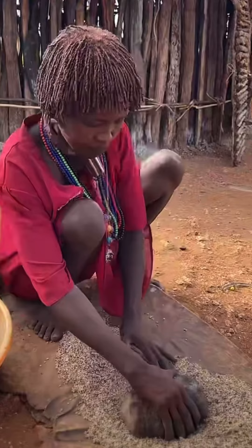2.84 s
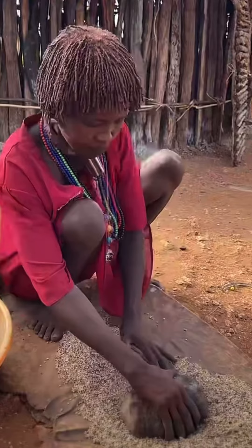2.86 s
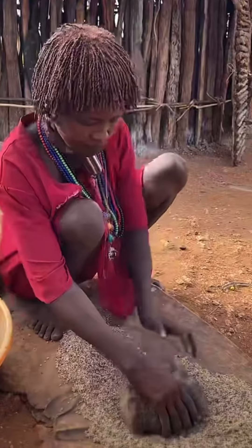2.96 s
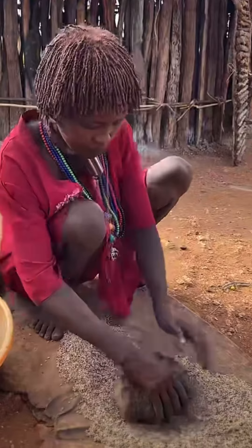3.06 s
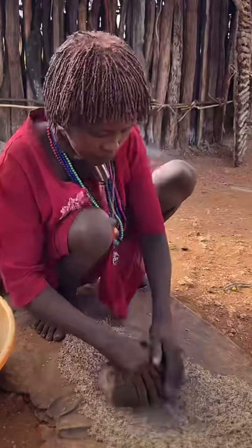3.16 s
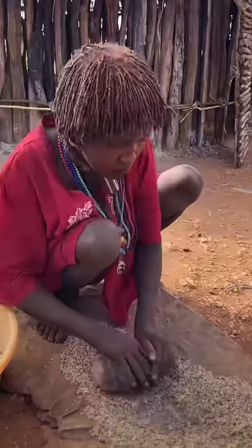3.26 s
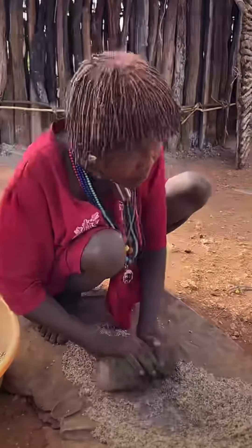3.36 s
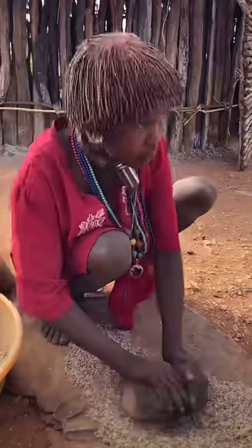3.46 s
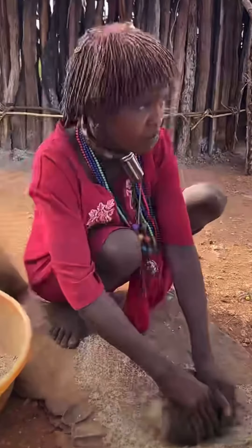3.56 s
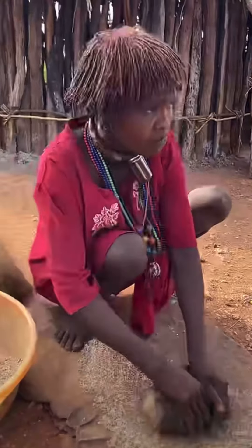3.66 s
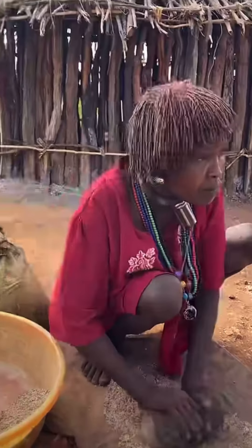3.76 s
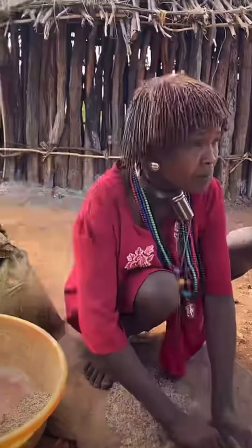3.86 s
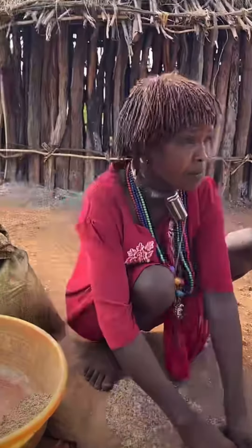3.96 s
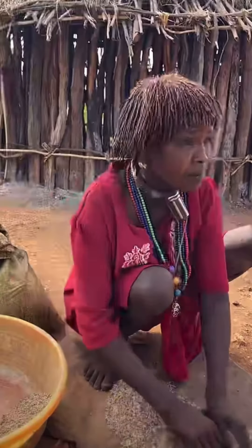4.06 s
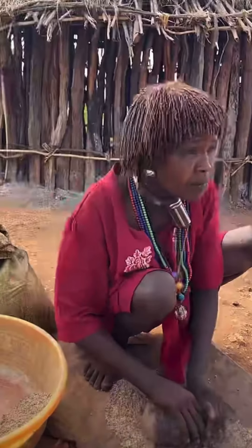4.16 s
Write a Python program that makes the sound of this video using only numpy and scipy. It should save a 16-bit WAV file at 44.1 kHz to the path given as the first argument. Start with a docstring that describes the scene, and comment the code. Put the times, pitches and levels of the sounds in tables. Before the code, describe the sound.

Close to the microphone in a quiet outdoor yard, a hand stone nudges grain on a slab, then grinds in strong rasping strokes with cracking kernels. The work drops to almost nothing for about a second, with a soft thump and faint touches, before rough strokes return with hissing loose grain and a deeper thump. The sound is dry, with almost no echo.

```python
"""Outdoors in a quiet yard, close by: a hand stone grinds dry grain on a stone slab.
Small nudges grow into strong strokes, the work nearly falls silent, then strong strokes return.
Tiny random fractures ring stone, slab and husks as rasp, rumble and crunch; whole kernels crack on top.
Loose grain hisses, the stone bumps the slab, and two dull thumps sink in pitch.
Near reflections, a faint echo, still air and at first a far tone place it in the yard."""
import sys
import numpy as np
from scipy import signal
from scipy.fft import rfft, irfft
from scipy.io import wavfile
from scipy.ndimage import uniform_filter1d

SR = 44100
rng = np.random.default_rng(int(sys.argv[2]) if len(sys.argv) > 2 else 0)


def digitize_waveform(pressure):
    """Quantize a signal to 16-bit integers and store it at the path in sys.argv[1].

    Rows of a 2-D input are taken as channels; values are limited to [-1, 1].
    """
    field = np.atleast_2d(pressure).T
    bounded = np.clip(field, -1, 1)
    quanta = np.round(bounded * 32767).astype(np.int16)
    wavfile.write(sys.argv[1], SR, quanta)


N = 185308

# colour of the slab's ring, relative: [f/Hz, level/dB]
SLAB_COLOUR = [(25, -38), (60, -26), (110, -17), (170, -10.5), (250, -9), (330, -2), (390, 3), (490, 5.5),
               (580, -1), (800, -24.5), (1400, -55)]
# colour of the splitting husks, relative: [f/Hz, level/dB]
HUSK_COLOUR = [(1700, -10), (2500, -0.5), (3200, 4), (4200, -3.5), (5100, -3), (6500, -10), (7900, -8),
               (8800, -15), (9600, -21.5), (12000, -28), (14200, -20), (16000, -30)]


def from_db(db):
    """Decibels to gain."""
    return 10 ** (np.asarray(db) / 20)


def rms_one(x):
    """Scale to an rms of 1."""
    return x / np.sqrt(np.mean(x ** 2) + 1e-20)


def drift(rate_hz):
    """Smooth random wandering with an rms of 1: noise through two equal one-pole lowpasses."""
    r = np.exp(-2 * np.pi * rate_hz / SR)
    noise = rng.standard_normal(N + SR)
    # the first second lets the filter settle
    return rms_one(signal.lfilter([1], [1, -2 * r, r * r], noise)[SR:])


def envelope_db(start_s, end_s, attack_s, release_s):
    """Attack, hold and release in dB; attack and release times are for 60 dB."""
    t = np.arange(N) / SR
    before = np.maximum(start_s - t, 0) / attack_s
    after = np.maximum(t - end_s, 0) / release_s
    return -60 * (before + after)


def resonance(force, hz, width_hz):
    """One damped mode, scaled to an rms of 1."""
    r = np.exp(-np.pi * width_hz / SR)
    poles = [1, -2 * r * np.cos(2 * np.pi * hz / SR), r * r]
    return rms_one(signal.lfilter([1, 0, -1], poles, force))


def body(force, colour, size=4096):
    """Ring a heavily damped body of the given colour: minimum phase, with unit energy."""
    hz, level_db = np.transpose(colour)
    grid_hz = np.maximum(np.arange(size // 2 + 1) * SR / size, 1)
    grid_db = np.interp(np.log(grid_hz), np.log(hz), level_db)
    # folding the cepstrum forward makes the response causal
    cepstrum = irfft(np.log(from_db(grid_db)))
    cepstrum[1:size // 2] *= 2
    cepstrum[size // 2 + 1:] = 0
    response = irfft(np.exp(rfft(cepstrum)))
    return signal.fftconvolve(force, response / np.linalg.norm(response))[:len(force)]


def stroke_levels():
    """The stone bites, is loaded unevenly and runs out: rasp, rumble and crunch in dB."""
    # moves of the hand stone, from nudges to full strokes; bite and die-away times are for 60 dB:
    # [start t/s, crest t/s, end t/s, crest rasp level/dB, bite t/s, die-away t/s,
    #  slab rumble relative to rasp level/dB, husk crunch relative to rasp level/dB]
    strokes = [(0.0, 0.024, 0.031, -49.5, 0.032, 0.35, 0.5, -8.5),
               (0.258, 0.327, 0.32, -38, 0.057, 0.31, -9, -9.5),
               (0.505, 0.53, 0.57, -32.5, 0.042, 0.13, -5.5, -23),
               (0.641, 0.638, 0.67, -32, 0.05, 0.12, 0.5, -13.5),
               (0.748, 0.738, 0.79, -34.5, 0.064, 0.098, -22, -16),
               (0.879, 0.946, 1.01, -19.5, 0.037, 0.21, -15.5, -11),
               (1.171, 1.277, 1.321, -17, 0.036, 0.16, -4, -12.5),
               (1.37, 1.388, 1.39, -31, .06, 0.1, -6, -7.5),
               (1.419, 1.484, 1.57, -14.5, 0.058, 0.13, -9, -13),
               (1.701, 1.763, 1.808, -18, 0.034, 0.069, -7.5, -14),
               (1.83, 1.816, 1.95, -29.5, 0.056, 0.1, -5, -10),
               (1.928, 1.968, 2.133, -17, 0.048, 0.14, -9, -11),
               (2.303, 2.322, 2.35, -45.5, .01, 0.12, -5.5, -4),
               (2.492, 2.538, 2.6, -42.5, 0.085, 0.049, -5, -16),
               (2.67, 2.86, 2.8, -57.5, .3, 0.65, -6, -18),
               (3.133, 3.14, 3.172, -37, 0.041, 0.074, -21, -14),
               (3.202, 3.254, 3.26, -49, .05, 0.25, -7, -13),
               (3.415, 3.499, 3.543, -17.5, 0.049, 0.19, -11, -13),
               (3.727, 3.794, 3.82, -20.5, 0.12, 0.12, -4.5, -13),
               (3.877, 3.888, 3.9, -33.5, 0.068, 0.1, -14, -10.5),
               (3.923, 4.01, 4.055, -18.5, 0.095, 0.037, -10, -13.5),
               (4.118, 4.203, 4.2, -19.5, 0.033, 0.1, -7.5, -13)]
    # the stone rests on the grain and never lies quite still: [start t/s, end t/s, rasp level/dB]
    rests = [(0.42, 2.17, -61), (2.45, 3.9, -60.5)]
    rest_fade_s, rest_rumble_db, rest_crunch_db = 0.22, -7.5, -10.5
    # the load rises towards a crest or falls away from it, down to the stone's own weight;
    # a crest outside the move leaves one slope
    lean_db_per_s, sag_limit_db = 90, 14.5

    t = np.arange(N) / SR
    moves = []
    for start_s, end_s, rest_db in rests:
        level_db = rest_db + envelope_db(start_s, end_s, rest_fade_s, rest_fade_s)
        moves.append((level_db, rest_rumble_db, rest_crunch_db))
    for start_s, crest_s, end_s, crest_db, bite_s, release_s, rumble_db, crunch_db in strokes:
        from_crest_s = np.abs(np.clip(t, start_s, end_s) - crest_s)
        sag_db = np.minimum(lean_db_per_s * from_crest_s, sag_limit_db)
        level_db = crest_db - sag_db + envelope_db(start_s, end_s, bite_s, release_s)
        moves.append((level_db, rumble_db, crunch_db))

    # overlapping moves add up in power
    power = np.full((3, N), 1e-10)
    for level_db, rumble_db, crunch_db in moves:
        heard = level_db > -100
        part_db = np.array([[0], [rumble_db], [crunch_db]])
        power[:, heard] += from_db(level_db[heard] + part_db) ** 2
    return 10 * np.log10(power)


def fractures(per_s, spread_db):
    """Random clicks of either sign, many small and a few large, scaled to an rms of 1."""
    sizes = from_db(spread_db * np.minimum(rng.exponential(1, N), 4))
    signs = rng.choice([-1, 1], N)
    return rms_one(sizes * signs * (rng.random(N) < per_s / SR))


def steady_hand(force, span_s):
    """The arm keeps the mean load even, while the quick judder stays."""
    mean_power = uniform_filter1d(force ** 2, int(span_s * SR))
    return force / np.sqrt(mean_power + 1e-9)


def grinding(rasp_db, rumble_db, crunch_db, judder_db, judder_hz, powder_share, crumb_judder,
             rolling_share):
    """The stone catches and slips on the grain; the same fractures shake stone, slab and husks."""
    # colour of the hand stone's rasp, relative: [f/Hz, level/dB]
    stone_colour = [(420, -51), (600, -6), (730, -1), (850, -1), (1000, 4.5), (1250, -8), (1460, -1.5),
                    (1620, -6.5), (1840, 6), (2030, 1), (2250, -15), (2600, -32), (3300, -50)]
    slips_db = judder_db * drift(judder_hz)
    coarse = fractures(per_s=2000, spread_db=3.0)
    powder = fractures(per_s=17000, spread_db=3.0)
    force = steady_hand(from_db(slips_db) * coarse, span_s=0.038)
    crumbs = from_db(crumb_judder * slips_db) * (coarse + powder_share * powder)
    crumbs = steady_hand(crumbs, span_s=0.056)
    # riding over unbroken kernels shakes the slab as well
    rolling = rms_one(force + rolling_share * rng.standard_normal(N))
    rasp = body(force * from_db(rasp_db), stone_colour)
    rumble = body(rolling * from_db(rumble_db), SLAB_COLOUR)
    crunch = body(crumbs * from_db(crunch_db), HUSK_COLOUR)
    return rasp + rumble + crunch


def shifting_contact(x, patchy_db, shift_hz, count=9):
    """The touching points keep moving, so each band of the ring comes and goes on its own."""
    out, rest = 0, x
    for edge_hz in np.geomspace(400, 10000, count):
        lowpass = signal.butter(3, edge_hz, fs=SR, output="sos")
        band = signal.sosfiltfilt(lowpass, rest)
        out = out + band * from_db(patchy_db * drift(shift_hz))
        rest = rest - band
    # roughly offset the mean power that the swings add
    return (out + rest) * from_db(-patchy_db ** 2 / 10)


def lesser_cracks(rasp_db, count=300):
    """More kernels burst at random while the stone bears down, as loud as the load allows."""
    kernels_per_s, breaking_load_db = 35, -29   # none breaks under a lighter rasp
    knock_rel_db, snap_rel_db, spread_db = -4, -17, 0.5   # relative to the rasp
    middle_hz, crumble_s = 1500, 0.0029
    chance = rng.random((count, 1))
    spread = rng.standard_normal((count, 3))
    # one chance to break in each time slot
    times_s = (np.arange(count) + chance[:, 0]) / kernels_per_s
    loads_db = np.interp(times_s * SR, np.arange(N), rasp_db, right=-np.inf)
    kernels = []
    for s, load_db, (a, b, c) in zip(times_s, loads_db, spread):
        if load_db > breaking_load_db:
            knock_db = load_db + knock_rel_db + spread_db * a
            snap_db = load_db + snap_rel_db + spread_db * b
            kernels.append((s, knock_db, snap_db, middle_hz * np.exp(0.23 * c), crumble_s))
    return kernels


def cracks(rasp_db, width_hz, edge_hz, pieces_per_s, piece_size, slab_db, burst_s, husk_ring, soft_hz,
           size=2048):
    """A kernel gives way at once, then its pieces break within a few milliseconds."""
    # single kernels that burst under the stone, faint to loud:
    # [t/s, knock level/dB, snap level/dB, knock f/Hz, crumbling time scale t/s]
    single_kernels = [(0.021, -28, -52, 1100, 0.002), (0.096, -60, -47.5, 1860, 0.0017),
                      (0.2554, -62, -40, 1210, 0.0012), (0.475, -43, -64, 1010, 0.0035),
                      (0.5097, -11.5, -44, 1000, 0.00033), (0.535, -21, -40, 1240, .0055),
                      (0.571, -16, -43, 884, 0.012), (0.58, -13, -24, 1440, .0023),
                      (0.645, -21.5, -48, 1240, .004), (0.752, -17.5, -35.5, 1530, 0.0033),
                      (0.881, -17, -19.5, 930, 0.0025), (0.894, -9.5, -32, 960, 0.0021),
                      (0.95, -17.5, -47, 1400, 0.00092), (0.959, -17, -33, 1380, 0.0066),
                      (0.98, -9, -41, 1148, 0.0062), (1.17, -23, -62, 670, 0.0025),
                      (1.183, -24, -38, 997, 0.0022), (1.2335, -10, -24.5, 1800, 0.0065),
                      (1.272, -12.5, -20, 790, .0023), (1.283, -19, -22, 1500, 0.0021),
                      (1.344, -20.5, -35, 1940, 0.0017), (1.411, -23, -28, 1520, 0.0011),
                      (1.435, -9, -17.5, 2000, 0.0021), (1.447, -21, -22, 1740, 0.0028),
                      (1.4753, -12, -36, 1820, 0.0028), (1.492, -8, -18.5, 1740, 0.0098),
                      (1.532, -13, -22, 1430, 0.0047), (1.7637, -10, -26.5, 1710, 0.0019),
                      (1.7906, -11, -27, 1500, 0.0038), (1.7987, -9.5, -24.5, 1602, 0.0007),
                      (1.934, -12, -24, 1380, 0.0012), (1.951, -10, -17, 1120, 0.0015),
                      (1.963, -10, -45, 1870, 0.0015), (2.0205, -18, -23, 1670, 0.00094),
                      (2.0274, -10.5, -22.5, 1700, 0.0016), (2.0637, -15, -25.5, 1420, 0.00082),
                      (2.1085, -13, -29.5, 1310, 0.0017), (2.2943, -17, -27.5, 1500, 0.0021),
                      (2.4955, -36.5, -34.5, 1176, 0.001), (2.522, -20, -43.5, 845, 0.0067),
                      (2.53, -27, -43, 1320, 0.00051), (2.56, -29, -49.5, 1742, 0.0013),
                      (3.1346, -23, -44.5, 1550, 0.0067), (3.153, -28.5, -39.5, 1400, 0.0055),
                      (3.19, -31, -58.5, 910, 0.0014), (3.419, -19, -26.5, 1410, 0.0005),
                      (3.428, -9.5, -19, 1600, 0.0014), (3.446, -11.5, -16.5, 1832, 0.00088),
                      (3.5057, -12, -21.5, 1760, 0.0071), (3.7857, -12.5, -28, 1430, 0.0035),
                      (3.814, -15, -31, 1370, 0.00089), (3.844, -11, -21.5, 1800, 0.0015),
                      (3.852, -10.5, -33, 1750, 0.0011), (3.884, -22, -41, 1590, 0.0013),
                      (3.9455, -10, -31, 1760, .0025), (3.9676, -10.5, -14.5, 1720, 0.0033),
                      (3.9826, -13.5, -25, 1590, .0013), (4.0155, -10, -15.5, 1260, 0.0021),
                      (4.042, -9.5, -36, 1541, 0.0067), (4.12, -18.5, -35, 1230, .0015)]
    out = np.zeros(N + size)
    t = np.arange(size) / SR
    stone_edge = signal.butter(8, edge_hz, fs=SR, output="sos")
    for s, knock_db, snap_db, hz, crumble_s in single_kernels + lesser_cracks(rasp_db):
        crumble_s = max(crumble_s, 1e-4)
        fading = np.exp(-(t / (1.94 * crumble_s)) ** 2)
        pieces = rng.standard_normal(size) * (rng.random(size) < pieces_per_s / SR)
        force = piece_size * pieces * fading
        force[0] = rng.choice([-1, 1])
        # the stone answers with a short knock, damped by hand and grain
        knock = rms_one(signal.sosfilt(stone_edge, resonance(force, hz, width_hz)))
        # the slab booms briefly underneath
        boom = resonance(resonance(force, 400, 260), 420, 300)
        knock = knock + from_db(slab_db) * boom
        # every husk splits with a shrill note of its own
        splinters = force + 0.25 * rng.standard_normal(size) * np.exp(-t / (crumble_s + 0.0023))
        shrill = resonance(splinters, rng.uniform(3000, 7710), 420)
        snap = rms_one(body(splinters, HUSK_COLOUR)) + husk_ring * shrill
        # a kernel that is squashed rather than shattered lacks the highest treble
        top_hz = np.clip(soft_hz * from_db(0.23 * (snap_db - knock_db)), 3000, .45 * SR)
        snap = rms_one(signal.sosfilt(signal.butter(2, top_hz, fs=SR, output="sos"), snap))
        # the levels hold for the short burst that carries the energy
        burst = from_db(knock_db) * knock + from_db(snap_db) * snap
        at = max(round(s * SR), 0)
        out[at:at + size] += burst * np.sqrt(burst_s * SR / size)
    return out[:N]


def brittle(x, shelf_hz):
    """Drier husks splinter with more top treble: a high shelf whose lift moves over time."""
    # lift of the top treble of crunch and cracks: [t/s, level/dB]
    brittleness = [(0, 9), (.9, 2), (1.3, 4.5), (1.75, 6.5), (2.15, 3.5), (2.6, -35.5), (3.5, -5),
                   (4.0, 3.5)]
    s, db = np.transpose(brittleness)
    lift_db = np.interp(np.arange(N) / SR, s, db)
    top = signal.sosfilt(signal.butter(1, shelf_hz, "high", fs=SR, output="sos"), x)
    return x + (from_db(lift_db) - 1) * top


def sliding_grain(attack_s):
    """Loose kernels pushed over the slab tick against each other in a thin, bright hiss."""
    # pushes of loose grain, die-away time for 60 dB: [start t/s, end t/s, level/dB, die-away t/s]
    sweeps = [(0, 0.07, -59, 0.3), (2.71, 2.823, -62, 0.67), (3.213, 3.273, -60, 0.34),
              (3.452, 3.542, -32, 0.08), (3.653, 3.788, -36.5, 0.39), (3.963, 4.055, -30, 0.017),
              (4.155, 4.2, -40.5, 0.085)]
    # colour of the ticking kernels, relative: [f/Hz, level/dB]
    grain_colour = [(900, -12), (1900, 10), (2500, -0.5), (3500, 1.5), (6500, -0.5), (8000, 0.5),
                    (10500, -13.5), (14500, -7.5), (16000, -10)]
    levels_db = [db + envelope_db(start_s, end_s, attack_s, release_s)
                 for start_s, end_s, db, release_s in sweeps]
    ticks = fractures(per_s=16000, spread_db=4.0)
    return body(ticks * from_db(np.max(levels_db, axis=0)), grain_colour)


def bumps():
    """The stone rocks onto the slab: short noise blows, cushioned by grain, ring only the slab."""
    # moments of rocking: [t/s, level/dB]
    blows = [(0.29, -36.5), (0.535, -23), (0.998, -32.5), (1.269, -18.5), (2.343, -43.5), (3.386, -35.5),
             (3.433, -23)]
    blow_s = 0.0044   # length of the hold, and attack time for 60 dB
    levels_db = [db + envelope_db(s, s + blow_s, blow_s, 10 * blow_s) for s, db in blows]
    return body(rng.standard_normal(N) * from_db(np.max(levels_db, axis=0)), SLAB_COLOUR)


def thumps():
    """Soft, heavy bumps whose pitch sinks as they swell and die."""
    # dull thumps: [t/s, level/dB, first f/Hz, last f/Hz, glide time constant t/s, swell t/s]
    heavy_blows = [(2.521, -22.5, 349, 297, 0.011, 0.0062), (3.607, -14.5, 404, 72, 0.00756, 0.014)]
    out = np.zeros(N)
    for s, level_db, first_hz, last_hz, glide_s, swell_s in heavy_blows:
        t = np.maximum(np.arange(N) / SR - s, 0)
        hz = last_hz + (first_hz - last_hz) * np.exp(-t / glide_s)
        swell = t / swell_s * np.exp(.5 - .5 * (t / swell_s) ** 2)
        phase = 2 * np.pi * np.cumsum(hz * (t > 0)) / SR
        # the blow is lopsided, which adds the octave
        octave = 0.57 * np.sin(2 * phase) * (1 - np.exp(-t / swell_s))
        out += from_db(level_db) * swell * (np.sin(phase) + octave)
    return out


def near_reflections(x):
    """Copies off slab and ground that arrive within milliseconds ripple the timbre."""
    # very near reflections: [delay t/s, share of the direct sound (signed gain)]
    reflections = [(.00073, 0.21), (.00205, -0.1), (.0034, 0.064)]
    n = np.arange(N)
    copies = [share * np.interp(n - round(delay_s * SR), n, x, left=0)
              for delay_s, share in reflections]
    return x + sum(copies)


def yard_echo(x, t60, dull_hz, wet_db):
    """Ground and a stick fence scatter a faint, dull tail: decaying, lowpassed noise."""
    t = np.arange(SR // 2) / SR
    tail = rng.standard_normal(len(t)) * from_db(-60 * t / t60) * (1 - np.exp(-t / .004))
    tail = signal.sosfilt(signal.butter(2, dull_hz, fs=SR, output="sos"), tail)
    return from_db(wet_db) * signal.fftconvolve(x, tail / np.linalg.norm(tail))[:N]


def yard():
    """Still air as coloured noise, and a faint, wavering far tone that holds, then dies away."""
    # colour of the still air, relative: [f/Hz, level/dB]
    air_colour = [(20, -13.5), (60, 11), (110, 13.5), (200, 7), (470, -4), (700, -18), (1800, -2),
                  (2500, -33), (8000, -14.5), (11000, -25.5), (16000, -20.5)]
    air_db, tone_db, tone_hz = -65, -59.5, 480
    tone_end_s, tone_fade_s = .11, .25   # the fade time is for 60 dB
    level_db = tone_db + envelope_db(0, tone_end_s, 1, tone_fade_s)
    phase = 2 * np.pi * np.cumsum(tone_hz + 3 * drift(8.7)) / SR
    air = from_db(air_db) * body(rng.standard_normal(N), air_colour)
    return air + from_db(level_db) * np.sin(phase)


def scene():
    """The grinding stone in a quiet yard."""
    rasp_db, rumble_db, crunch_db = stroke_levels()
    rubbing = grinding(rasp_db, rumble_db, crunch_db, judder_db=2.5, judder_hz=109,
                       powder_share=1.3, crumb_judder=1.0, rolling_share=0.63)
    rubbing = shifting_contact(rubbing, patchy_db=1.5, shift_hz=35)
    bursts = cracks(rasp_db, width_hz=860, edge_hz=2165, pieces_per_s=1900, piece_size=0.75,
                    slab_db=-22, burst_s=0.0041, husk_ring=0.26, soft_hz=28000)
    crushed = brittle(rubbing + bursts, shelf_hz=8540)
    close = near_reflections(crushed + sliding_grain(attack_s=0.047))
    stonework = close + bumps() + thumps()
    echo = yard_echo(stonework, t60=0.029, dull_hz=3370, wet_db=-24.5)
    return (stonework + echo + yard())[None]


def record(dry):
    """The highest peaks are rounded, the deep bass is shed and the top is cut."""
    rounded = dry / (1 + dry ** 6) ** (1 / 6)
    lean = signal.sosfilt(signal.butter(1, 40, "high", fs=SR, output="sos"), rounded)
    top_cut = signal.ellip(10, .2, 80, 15900, fs=SR, output="sos")   # steep lowpass at 15.9 kHz
    return signal.sosfilt(top_cut, lean)


dry = scene()
out = record(dry)
digitize_waveform(out)
```